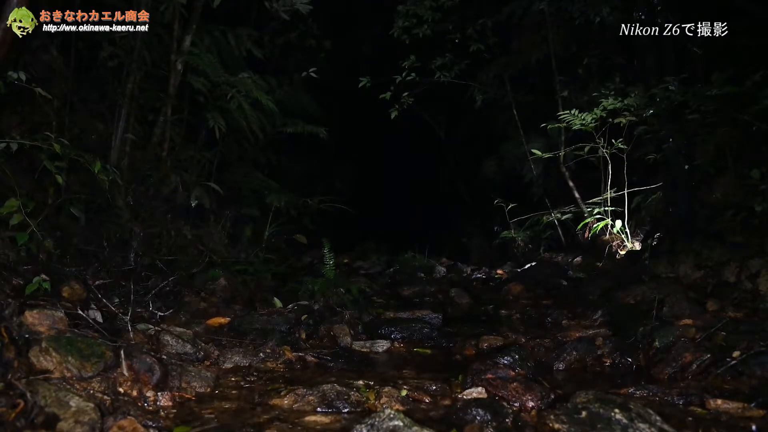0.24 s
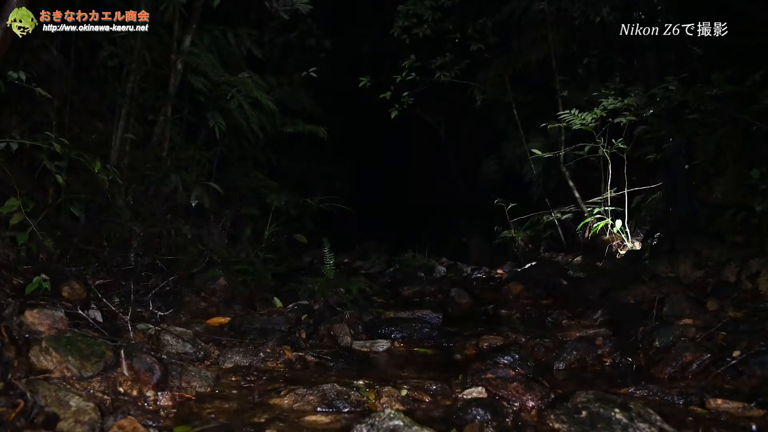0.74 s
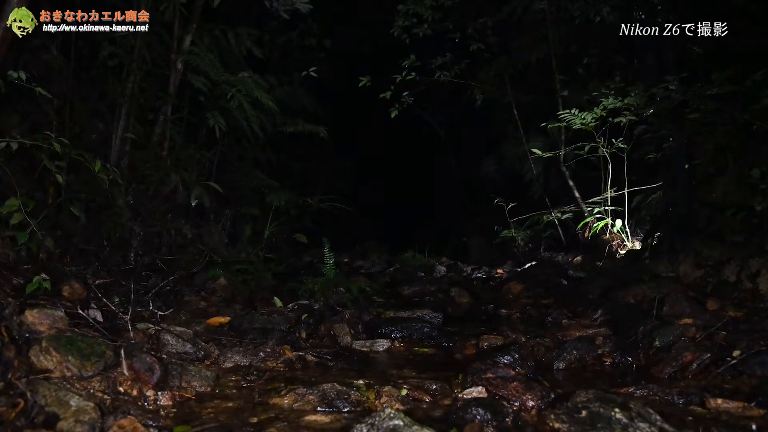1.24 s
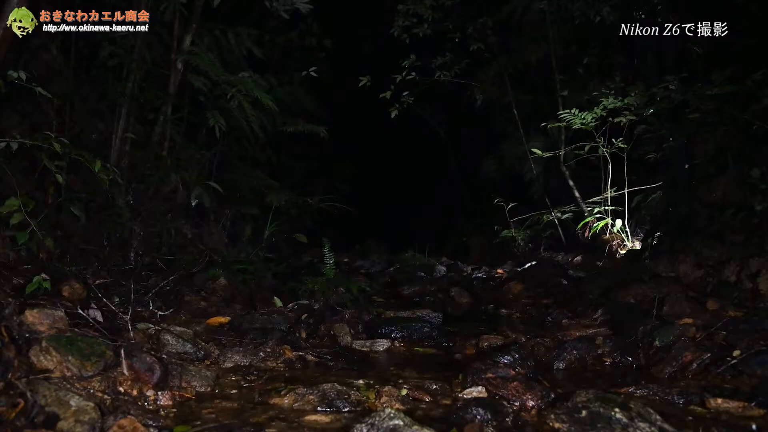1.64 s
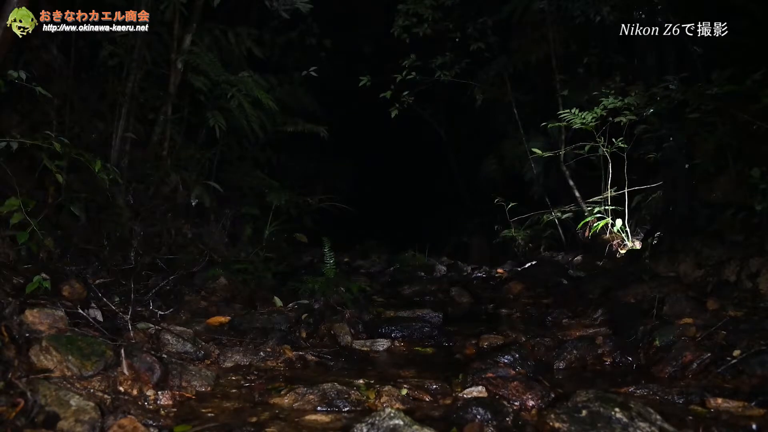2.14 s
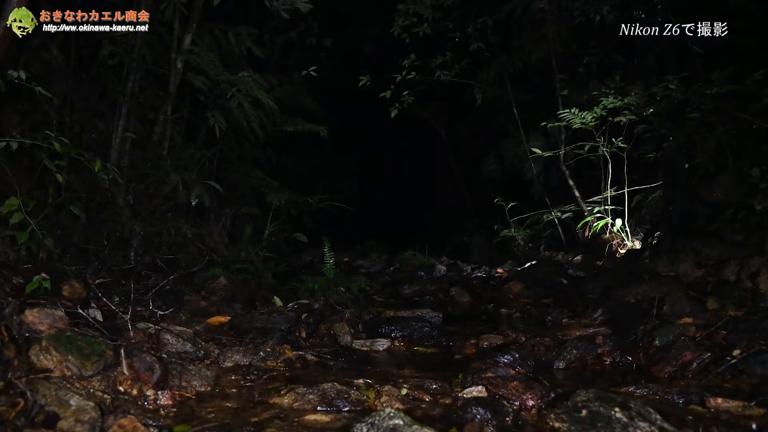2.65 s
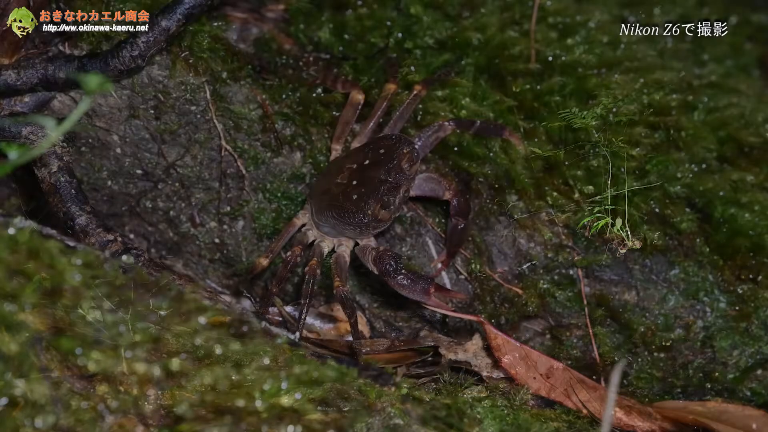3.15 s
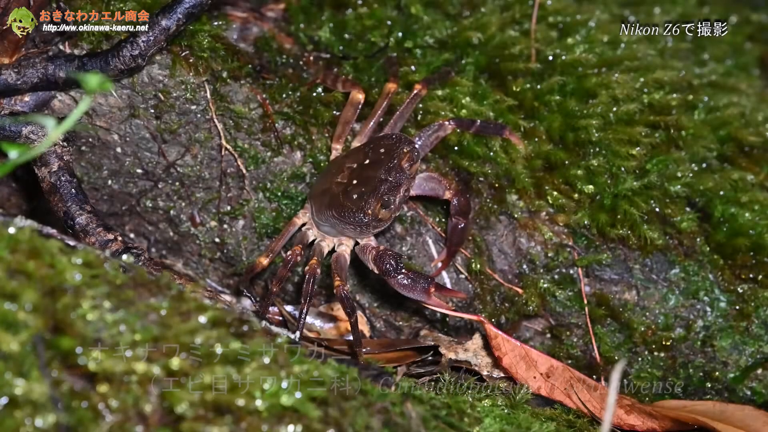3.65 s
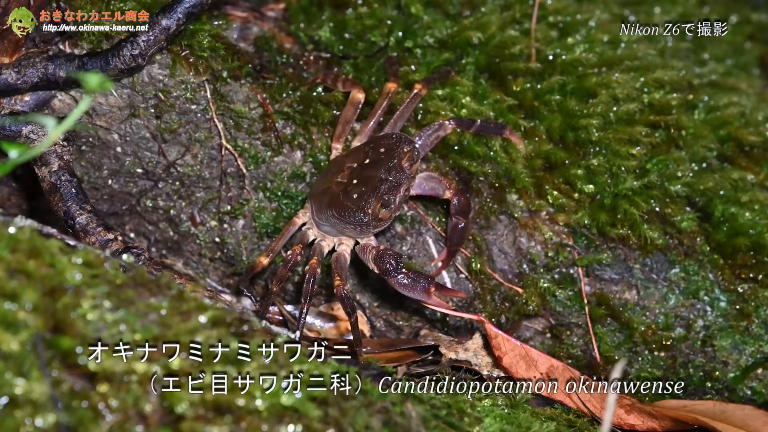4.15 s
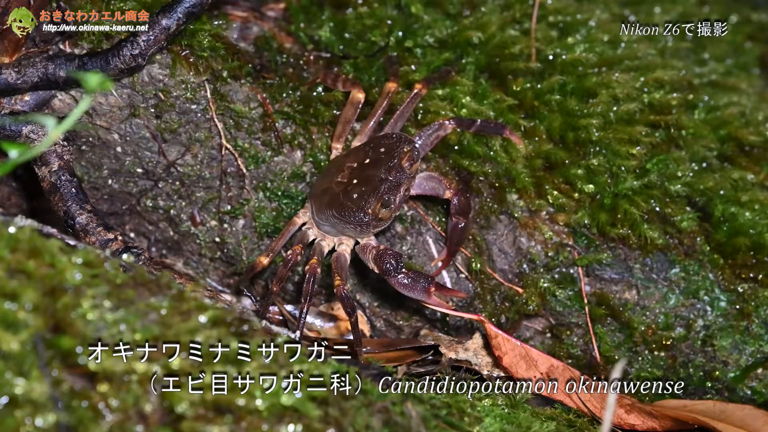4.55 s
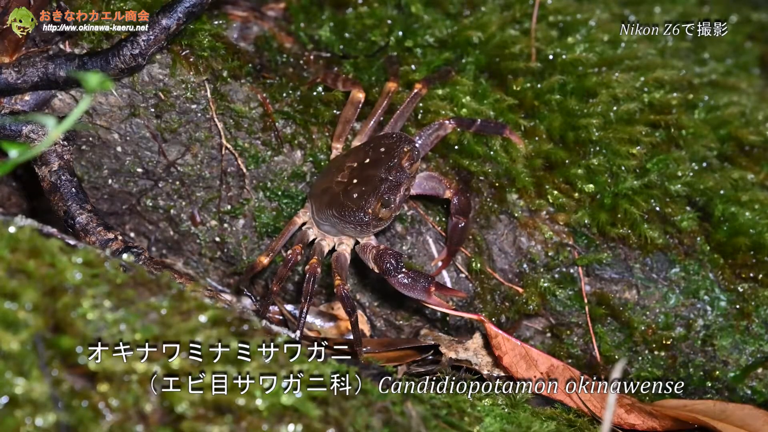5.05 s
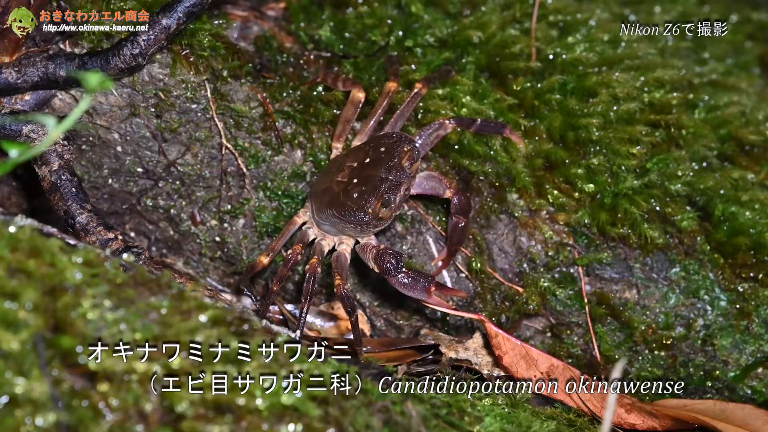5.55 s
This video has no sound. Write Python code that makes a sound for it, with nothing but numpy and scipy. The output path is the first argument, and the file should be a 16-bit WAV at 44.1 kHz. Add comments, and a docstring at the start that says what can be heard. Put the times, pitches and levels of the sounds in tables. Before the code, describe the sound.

A loud cricket and katydid chorus over a rushing stream fades into quieter trickling water with a few crickets trilling.

```python
"""A loud chorus of crickets and katydids, all round the microphone in a night forest, over a rushing stream.
The insects sing by scraping their wings. The grove fades out and a quieter spot on the bank fades in:
water trickles over stones to the right, ringing as bubbles of trapped air, while a few crickets trill
nearby and others sing farther off. A thin steady whine, high in the treble, runs through both places."""
import sys
import numpy as np
from scipy import signal
from scipy.fft import rfft, irfft, next_fast_len
from scipy.io import wavfile
from scipy.ndimage import uniform_filter1d

SR = 44100
rng = np.random.default_rng(int(sys.argv[2]) if len(sys.argv) > 2 else 0)


def wav_record(signal):
    """Record a signal, one row per channel, as 16-bit PCM in the file named by sys.argv[1]."""
    frames = np.transpose(np.atleast_2d(signal))
    bounded = np.clip(frames, -1, 1)
    # unit amplitude maps onto the largest positive 16-bit level
    quanta = np.round(bounded * 32767).astype(np.int16)
    wavfile.write(sys.argv[1], SR, quanta)


N = 255339
TIME = np.arange(N) / SR
GROVE_END_S = 3.005


def gain_of(db):
    """Decibels to a factor."""
    return 10 ** (np.asarray(db) / 20)


def unit_rms(x):
    """Scales to rms 1."""
    return x / np.sqrt(np.mean(x ** 2) + 1e-20)


def value_at(points, hz):
    """A spectrum's value at hz, on a log-frequency axis."""
    f, value = np.transpose(points)
    return np.interp(np.log(hz + 1), np.log(f + 1), value)


def pan(db):
    """A pair of gains, the left db above the right."""
    return gain_of(np.array([[db], [-db]]) / 2)


def add(mix, start_s, sound):
    """Mixes a sound in at start_s."""
    part = mix[max(round(start_s * SR), 0):][:len(sound)]
    part += sound[:len(part)]


def drift(per_s):
    """A slow random wander of about unit size."""
    knots = rng.standard_normal(1024)
    return np.interp(TIME * per_s, np.arange(len(knots)), knots)


def ramp(start_s, end_s):
    """Rises evenly from 0 to 1."""
    return np.clip((TIME - start_s) / (end_s - start_s), 0, 1)


def arch_over(start_s, end_s):
    """Swells from 0 to 1 halfway, and back to 0."""
    return np.sin(np.pi * ramp(start_s, end_s))


def forest(x, wet_db, t60_s):
    """The direct sound plus its scatter from trunks and rocks, unlike on each side of the microphone."""
    t = np.arange(SR // 2) / SR
    scatter = rng.standard_normal((2, len(t))) * gain_of(-60 * t / t60_s) * (t > .003)
    scatter /= np.linalg.norm(scatter, axis=1, keepdims=True)
    size = next_fast_len(N, True)  # circular, so the air is already ringing at the start
    echo = irfft(rfft(x, size) * rfft(scatter, size), size)[:, :N]
    return x + gain_of(wet_db) * echo


def cricket(hz, fall_hz, per_s, duty=.55, unsteady=.008, waver_hz=16, grit=0.36):
    """Each wing stroke draws the scraper over the file: a short tone that sinks as the wing slows."""
    pace = per_s * (1 + unsteady * drift(6))
    stroke = (rng.random() + np.cumsum(pace) / SR) % 1
    along_file = np.minimum(stroke / duty, 1)
    pitch = hz + fall_hz * (.5 - along_file) + waver_hz * drift(70)
    teeth = 1 + grit * drift(900)  # the file's teeth catch unevenly
    return teeth * np.sin(np.pi * along_file) * np.sin(2 * np.pi * np.cumsum(pitch) / SR)


def chorus(hz, spread_hz, fall_hz, per_s, db, pan_db, count=4):
    """Several crickets of one kind, each at its own pitch, pace and place among the trees."""
    voices = np.zeros((2, N))
    for detune in np.linspace(-.5, .5, count):
        voice = cricket(hz + spread_hz * detune, fall_hz, per_s * (1 + .12 * rng.uniform(-1, 1)))
        distant = unit_rms(forest(voice, wet_db=9, t60_s=0.48))
        voices += gain_of(-7 * abs(detune)) * distant * pan(0.81 * rng.uniform(-0.38, 1))
    return gain_of(db) * unit_rms(voices) * pan(pan_db)


def ringing_crickets(waver_hz=6, flutter_db=2):
    """Distance blurs their strokes into a held, fluttering ring, different on each side."""
    # crickets that hold one clean pitch above the rest: pitch_hz, relative_db
    singers = [(2643, -36), (2723, -41), (3801, -29), (3907, -26), (7004, -35), (7193, -33), (7387, -47),
               (7498, -33.5), (7735, -32.5), (7889, -32), (8368, -30)]
    out = np.zeros((2, N))
    for hz, db in singers:
        for side in out:
            turns = np.cumsum(hz + waver_hz * drift(29.68)) / SR + rng.random()
            flutter = gain_of(flutter_db * drift(20))
            side += gain_of(db) * unit_rms(flutter * np.sin(2 * np.pi * turns))
    return out


def wash(spectrum, likeness, patchy_db):
    """Countless far splashes and calls merge into noise whose level wanders in small patches."""
    frames, hz = N // 256 + 5, np.fft.rfftfreq(1024, 1 / SR)
    a, b, c, d, patches = rng.standard_normal((5, frames, len(hz)))
    patches = unit_rms(uniform_filter1d(uniform_filter1d(patches, size=5, axis=0), size=9, axis=1))
    same = np.clip(value_at(likeness, hz), -1, 1)
    left = a + 1j * b
    right = same * left + np.sqrt(1 - same ** 2) * (c + 1j * d)
    spectra = np.array([left, right]) * gain_of(value_at(spectrum, hz) + patchy_db * patches)
    _, noise = signal.istft(spectra, nperseg=1024, noverlap=768, time_axis=1, freq_axis=2)
    return unit_rms(noise[:, :N])


def bubble(hz, cycles, rise):
    """A pocket of air rings for some cycles, its pitch climbing as it nears the surface."""
    t = np.arange(SR // 8) / SR
    age = t * hz / cycles
    pitch = hz * (1 + rise * (age - .5))
    attack = 1 - np.exp(-t * hz / 2)
    return attack * np.exp(-age) * np.sin(2 * np.pi * np.cumsum(pitch) / SR)


def babble(per_s, count=48):
    """Bubbles of many sizes burst at random, most of them faint."""
    # the stream's bubbles, large to small: pitch_hz, relative_db
    sizes = [(220, -18), (400, -11), (550, -4.5), (800, -1.5), (1200, 4.5), (1650, 3.5), (2300, 8.5),
             (3200, -14)]
    out = np.zeros(N)
    for hz in np.geomspace(sizes[0][0], sizes[-1][0], count):
        ring = bubble(hz, cycles=rng.uniform(5.8, 9.9), rise=rng.uniform(0, 0.106))
        bursts = rng.random(N) < per_s / count * np.sqrt(hz / 1000) / SR  # small ones come more often
        strength = gain_of(value_at(sizes, hz) + 3.1 * np.minimum(rng.exponential(1, N), 3))
        out += signal.oaconvolve(bursts * strength, ring)[:N]
    return unit_rms(out)


def whine(db, pan_db, right_lag_rad, hz=15687.7, level_jitter_db=0.8):
    """One thin, steady high tone, with a slight random jitter added to its level."""
    tone = np.sqrt(2) * np.sin(2 * np.pi * hz * TIME - np.array([[0], [right_lag_rad]]))
    return gain_of(db + level_jitter_db * drift(60)) * pan(pan_db) * tone


def chirping_cricket(first_s=0.405, every_s=0.513, length_s=0.13):
    """One cricket in the grove breaks its song into short, evenly spaced chirps."""
    gate = sum(arch_over(s, s + length_s) for s in np.arange(first_s, GROVE_END_S, every_s))
    voice = cricket(hz=5880, fall_hz=200, per_s=44)
    return gain_of(-36.5) * gate * unit_rms(forest(voice, wet_db=8, t60_s=0.26))


def grove(surge_db=3.5, slacken_db_per_s=0.86):
    """Among the trees, over the rushing stream: the chorus slowly slackens, and once surges together."""
    # kinds of cricket: pitch_hz, spread_hz, fall_hz, strokes_per_s, relative_db, pan_db, swell_share
    kinds = [(2542, 260, 420, 24.5, -29.5, -2, 0.48), (3846, 170, 260, 43, -22, -0.5, 1),
             (3788, 260, 740, 36, -20, 3.5, 0.39), (5650, 600, 700, 39, -43, 1, .3),
             (7184, 450, 700, 73, -20, -1.5, 0.14), (7934, 900, 1100, 24.5, -21, 2.5, 0.25),
             (8940, 1300, 1500, 57, -27.5, 1.5, .2)]
    # water and the farthest insects: frequency_hz, relative_density_db
    spectrum = [(15, -3), (40, 1), (170, 1.5), (400, -2.5), (720, 0), (950, -2), (1400, 0.5), (2200, -3.5),
                (4200, 7.5), (4800, -9), (5500, 3.5), (8000, 9), (10200, 3.5), (12200, -2.5), (15600, -9.5)]
    # how alike that wash is on both sides: frequency_hz, correlation
    likeness = [(30, 1), (300, 1), (700, 0.78), (1100, 0.058), (2000, 0.011), (2600, 1), (3600, 0.015),
                (8000, 0.34), (14000, 0)]
    swell_db = surge_db * ramp(1.245, 1.375) - slacken_db_per_s * TIME
    insects = sum(chorus(*kind) * gain_of(share * swell_db) for *kind, share in kinds)
    ring = ringing_crickets() * gain_of(1.2 * swell_db)
    rush = gain_of(-22.5) * wash(spectrum, likeness, patchy_db=1.64)
    bubbles = gain_of(-42.5) * forest(babble(per_s=500), wet_db=0, t60_s=0.13)
    chirps = chirping_cricket()
    return insects + ring + chirps + rush + bubbles + whine(db=-27, pan_db=2.5, right_lag_rad=-0.48)


def hiss(hz, width_hz):
    """Half a second of noise in one broad resonance."""
    f = np.fft.rfftfreq(SR // 2, 1 / SR)
    resonance = np.exp(-2 * ((f - hz) / width_hz) ** 2)
    return unit_rms(irfft(resonance * rfft(rng.standard_normal(SR // 2))))


def katydids(every_s=.265, length_s=.28, fall_db_per_s=4):
    """Stiff wings scrape out high, swelling rasps, singly or in a phrase that weakens as it goes."""
    # spells of rasping: start_s, end_s, first_rasp_db
    phrases = [(0.785, 2.0, -31), (2.65, 2.8, -53), (4.81, 4.95, -49)]
    out, swell = np.zeros((2, N)), signal.windows.hann(round(length_s * SR))
    for start_s, end_s, db in phrases:
        for s in np.arange(start_s, end_s, every_s):
            for side in out:
                rasp = swell * hiss(hz=14400, width_hz=1700)[:len(swell)]
                add(side, s, gain_of(db - fall_db_per_s * (s - start_s)) * rasp)
    return out * pan(1)


def stray_bubbles(per_s, db, hz, octaves, scatter_db=2):
    """Bubbles of about one size at random moments, as rows: start_s, relative_db, pitch_hz."""
    starts = (np.arange(64) + rng.random(64)) / per_s
    rows = [(s, db + scatter_db * rng.standard_normal(), hz * 2 ** (octaves * rng.standard_normal()))
            for s in starts]
    return [row for row in rows if row[0] < N / SR]


def single_bubbles(rows, cycles, rise):
    """Rings one bubble for each row."""
    out = np.zeros(N)
    for start_s, db, hz in rows:
        ring = bubble(hz, cycles, rise)
        add(out, start_s, gain_of(db) * ring / abs(ring).max())
    return out


def hollows(lumpy_db=4):
    """Lumpy flow rings the air in pockets between the stones, and briefly gushes harder into one."""
    # air pockets: pitch_hz, width_hz, level_db, gush_db
    pockets = [(214.5, 43, -59, 0), (388, 54, -55.5, 6), (553, 60, -54, 0)]
    out, gush = np.zeros(N), arch_over(3.7, 4.37)
    for hz, width_hz, db, gush_db in pockets:
        flow = rng.standard_normal(N) * gain_of(lumpy_db * drift(22))
        resonance = signal.iirpeak(hz, hz / width_hz / 1.63, fs=SR)
        ring = signal.lfilter(*resonance, signal.lfilter(*resonance, flow))
        out += gain_of(db + gush_db * gush) * unit_rms(ring)
    return out


def trickle(left_lag_samples=4):
    """Water runs over stones to the right of the microphone: a babble with louder plinks and gulps."""
    # the loudest small bubbles: start_s, relative_db, pitch_hz
    loud_plinks = [(3.5983, -22.5, 1600), (3.9366, -19.5, 1680), (4.1586, -24.5, 1670),
                   (4.5191, -29.5, 1240), (4.5822, -29.5, 1010), (4.8307, -26.5, 1530),
                   (4.9222, -26.5, 1790), (5.0958, -25, 1700), (5.4655, -27, 2210), (3.8984, -33, 1190),
                   (3.9305, -27, 1190)]
    # the loudest large bubbles: start_s, relative_db, pitch_hz
    loud_gulps = [(3.67, -40.5, 383), (4.438, -38, 460), (4.499, -35.5, 554), (4.644, -30.5, 553),
                  (5.426, -35, 524), (5.529, -38, 552)]
    # water and the farthest insects: frequency_hz, relative_density_db
    spectrum = [(15, -19), (80, -7), (220, -8.5), (550, -6), (800, -7), (1600, 3), (2500, 4.5), (3400, 3),
                (4600, -1.5), (6300, -1), (8500, -1), (10000, -5.5), (12500, -11.5), (15600, -8)]
    # how alike that wash is on both sides: frequency_hz, correlation
    likeness = [(30, 0.99), (500, 1), (1000, 0.92), (1800, 0.15), (2800, 0.81), (4000, 0.24), (8000, 0)]
    faint_plinks = stray_bubbles(per_s=4, db=-33, hz=1650, octaves=-0.28)
    faint_gulps = stray_bubbles(per_s=4, db=-42, hz=473, octaves=.2)
    plinks = single_bubbles(loud_plinks + faint_plinks, cycles=8.1, rise=0.101)
    gulps = single_bubbles(loud_gulps + faint_gulps, cycles=7.3, rise=0.012)
    small = gain_of(-4.5) * forest(plinks, wet_db=-2, t60_s=0.56) * pan(-8.5)
    large = gain_of(-2.5) * gulps + hollows()
    many = gain_of(-43) * forest(babble(per_s=800), wet_db=-18, t60_s=0.058) * pan(-2.5)
    rush = gain_of(-35) * wash(spectrum, likeness, patchy_db=1.8) * pan(-1.5)
    left, right = small + large + many + rush
    return np.array([np.roll(left, left_lag_samples), right])


def drop(start_s=3.279, db=-33, t60_s=.05):
    """A drop hits a stone: a bright tick that dies at once."""
    out, tick = np.zeros(N), hiss(hz=5150, width_hz=800)
    add(out, start_s, tick * gain_of(db - 60 * TIME[:len(tick)] / t60_s))
    return out


def near_crickets():
    """Crickets near the microphone start up, swell and stop; some strokes bite harder than others."""
    # single trills: start_s, end_s, pitch_hz, fall_hz, strokes_per_s, level_db, pan_db
    trills = [(3.62, 4.11, 3770, 240, 40, -33.5, -0.5), (3.92, 4.73, 3796, 280, 43, -31.5, 3.5),
              (4.65, 5.3, 3980, 240, 40, -35.5, 0.5), (4.52, 5.26, 3580, 760, 37, -36.5, 0),
              (5.26, 5.87, 3700, 300, 41, -46.5, -7)]
    out = np.zeros((2, N))
    for start_s, end_s, hz, fall_hz, per_s, db, pan_db in trills:
        voice = cricket(hz, fall_hz, per_s, unsteady=.04, waver_hz=45.1, grit=0.28)
        bite = gain_of(1.2 * drift(40))
        trill = unit_rms(forest(voice * bite, wet_db=7, t60_s=0.24))
        out += gain_of(db) * pan(pan_db) * arch_over(start_s, end_s) * trill
    return out


def bank():
    """At the water's edge: the trickle, a few near crickets and a thinner chorus farther off."""
    # kinds of far cricket: pitch_hz, spread_hz, fall_hz, strokes_per_s, level_db, pan_db
    kinds = [(3934, 160, 330, 41, -40, 0.98), (7180, 670, 970, 18, -40, 1), (7870, 900, 1200, 24.5, -43, 9)]
    water = trickle() + drop()
    insects = sum(chorus(*kind) for kind in kinds) + near_crickets()
    return water + insects + whine(db=-40, pan_db=.5, right_lag_rad=2.18)


def scene():
    """The grove fades out as the bank fades in; katydids rasp in both places."""
    fade_out = (1 - ramp(1.884, GROVE_END_S)) ** 1.85
    fade_in = ramp(2.557, 3.44)
    return gain_of(0.62) * grove() * fade_out + bank() * fade_in + katydids()


def record(dry):
    """The tallest peaks clip, then the treble is cut off just above the whine."""
    lowpass = signal.firwin(2047, cutoff=15760, window=("kaiser", 8), fs=SR)
    return signal.oaconvolve(np.clip(dry, -1, 1), lowpass[None], "same")


dry = scene()
out = record(dry)
wav_record(out)
```